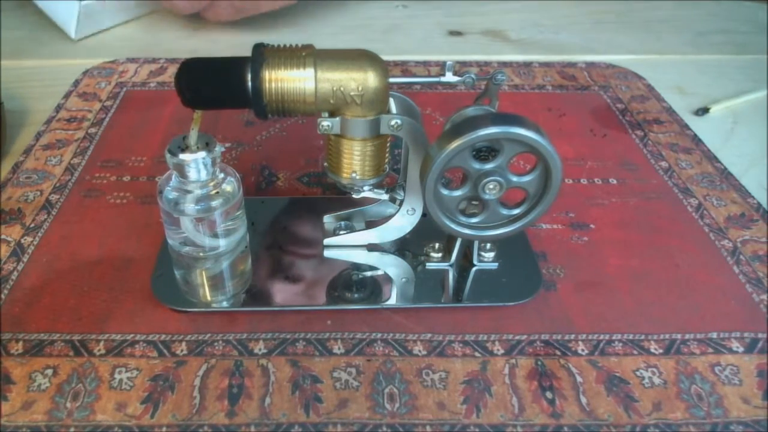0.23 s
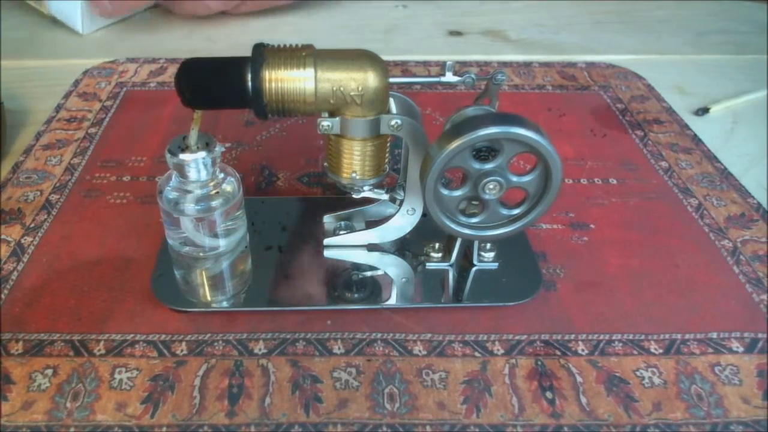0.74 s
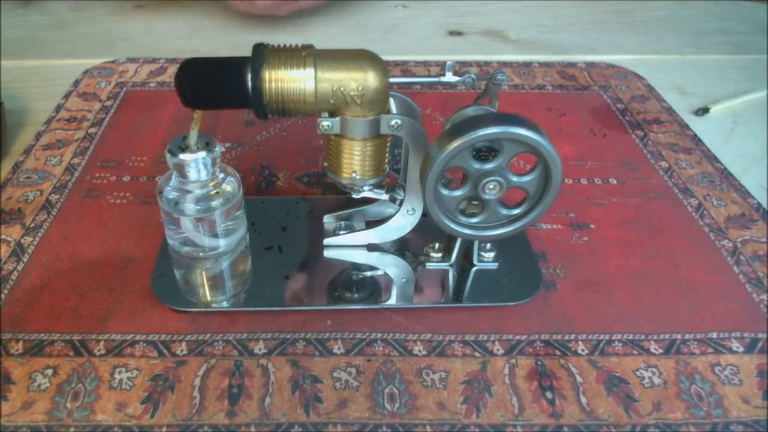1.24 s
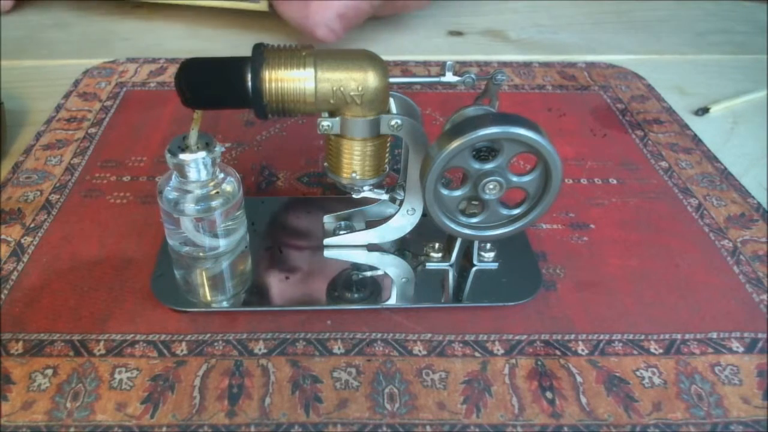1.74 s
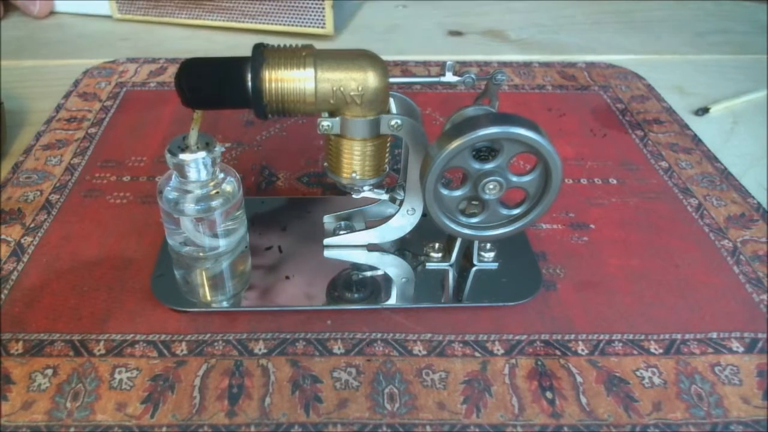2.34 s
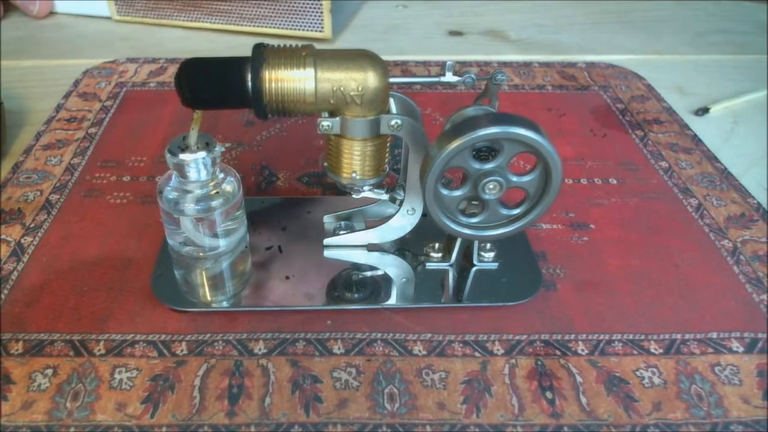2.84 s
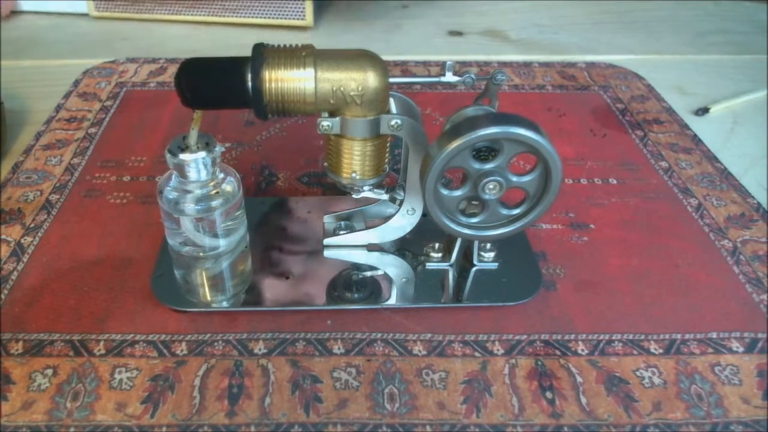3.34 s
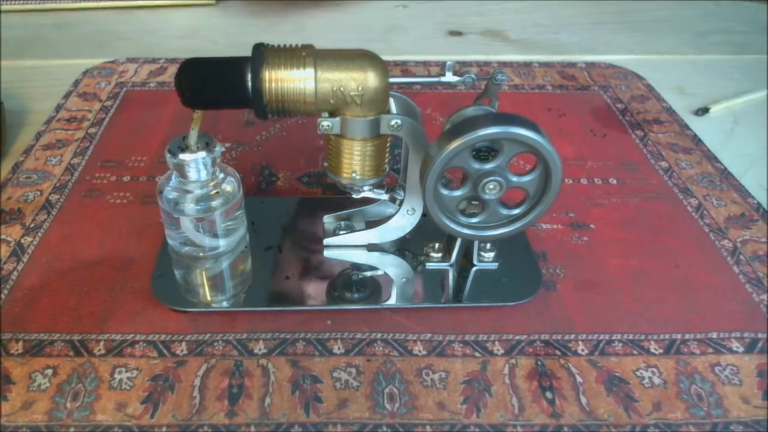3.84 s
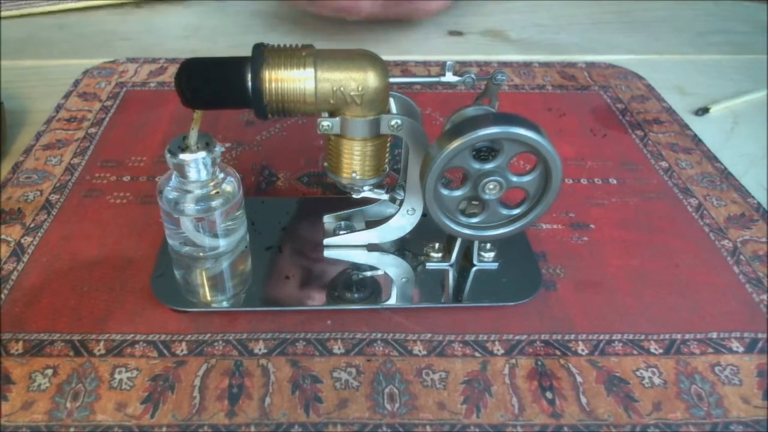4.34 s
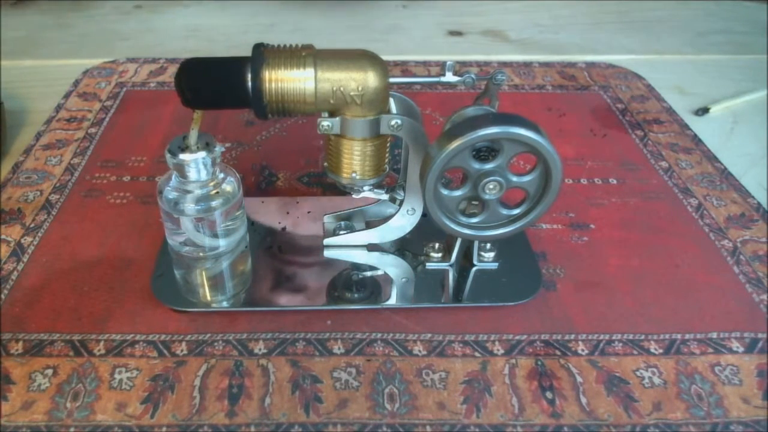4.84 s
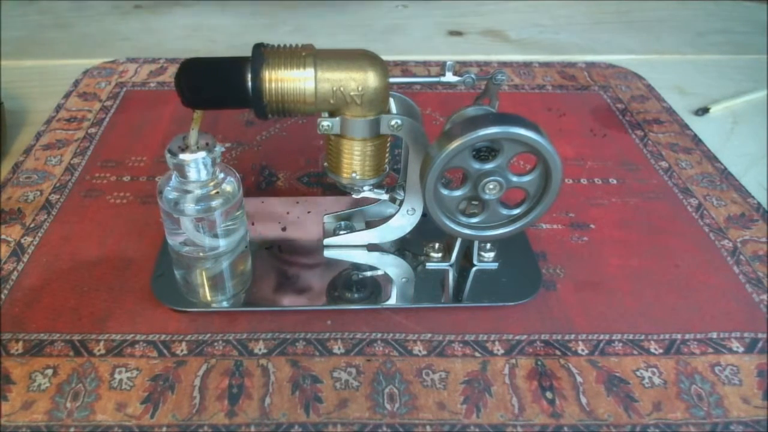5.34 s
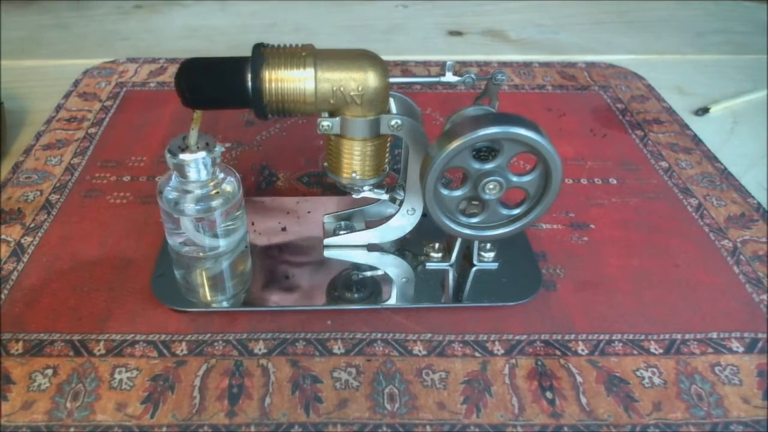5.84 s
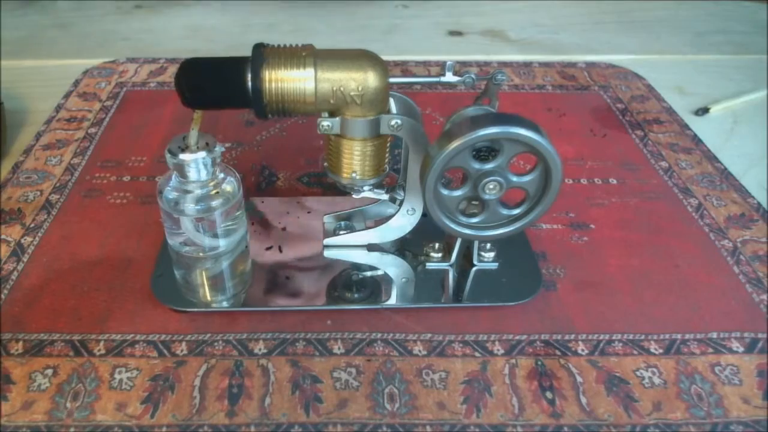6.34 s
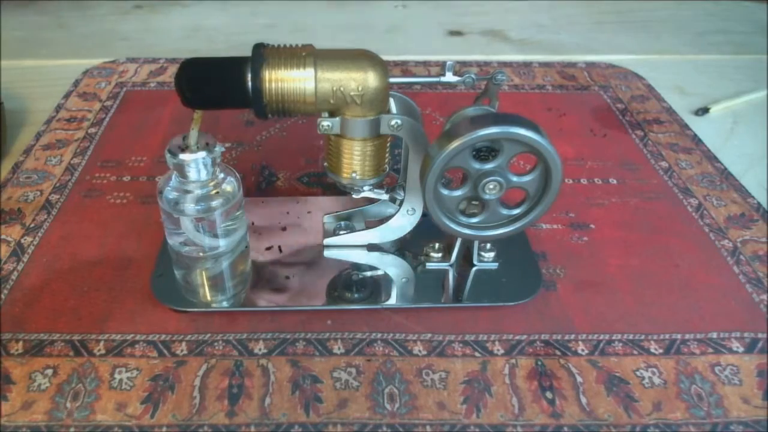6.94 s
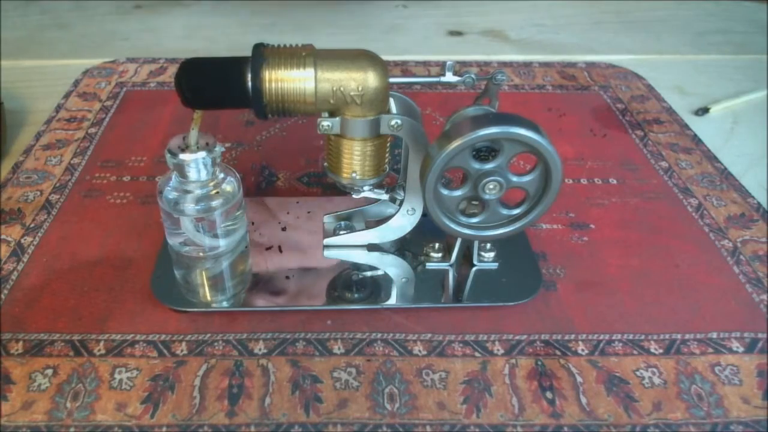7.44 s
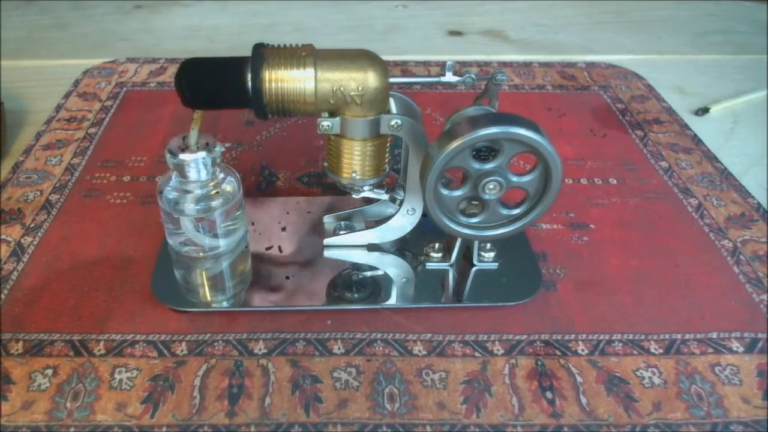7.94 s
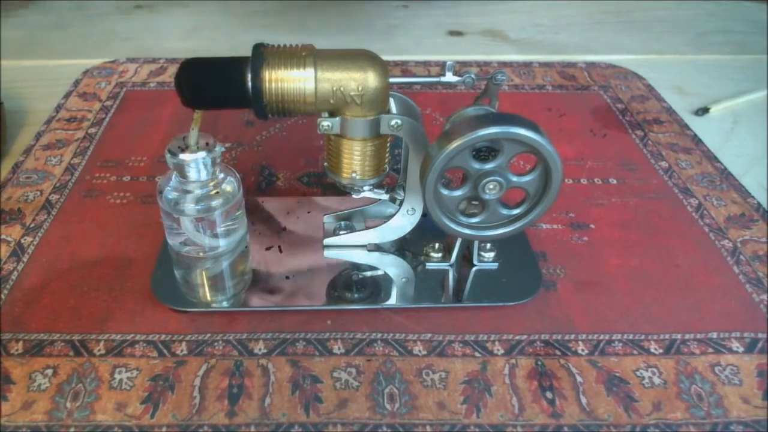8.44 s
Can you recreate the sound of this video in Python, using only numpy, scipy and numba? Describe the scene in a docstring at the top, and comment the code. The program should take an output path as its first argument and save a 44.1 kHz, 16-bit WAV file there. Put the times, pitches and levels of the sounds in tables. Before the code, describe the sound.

A small, quiet room with low rumble, faint steady hiss and hum; everything happens close to the microphone. From 0 s fingers rustle softly on a cardboard matchbox. Around 0.5-0.8 s the drawer eases out with a hollow, gritty scrape and dull thud. More rubbing and small knocks follow, and at 1.4-1.8 s it slides further open, ending in a firmer tap. From 2.1 to 3 s loose matchsticks tick and rub as one is picked out. At 3.4-3.6 s the box scrapes shut. Light finger rustles and taps continue to 4.7 s. Short raspy strikes with squeaky chatter and hollow box knocks come at about 5.1, 6.05, 7.16 and 7.8 s, with soft handling between the first few. The fifth, at 8.1 s, is the loudest and sharpest, bursting into crackling sparks, then a soft fluttering, fizzing hiss until the end.

```python
"""Fingers rustle on a cardboard matchbox, close by in a small room with a faint hum.
The drawer slides open with a gritty scrape, loose matches tick as one is picked out, and the box is pushed shut.
The match is struck five times: its head chatters over the dotted striking strip and rings the hollow box.
The last stroke lights it and it flares with a soft hiss.
Rubbing is made of tiny random slips, squeaks of swept tones, and knocks and sparks of short dying bursts."""
import sys
import numpy as np
from scipy import signal
from scipy.fft import rfft, irfft
from scipy.io import wavfile
from numba import njit

SR = 44100
rng = np.random.default_rng(int(sys.argv[2]) if len(sys.argv) > 2 else 0)


def to_wav(s):
    """Save 16-bit WAV."""
    ch = np.atleast_2d(s).T  # columns
    pcm = np.round(np.clip(ch, -1, 1) * 32767)  # PCM
    wavfile.write(sys.argv[1], SR, pcm.astype(np.int16))


N = 383669
T = np.arange(N) / SR  # time of every sample, s
TOP_HZ = 15850  # upper limit of the treble


def undb(db):
    """Turn decibels into a gain."""
    return 10 ** (np.asarray(db) / 20)


def unit(x):
    """Scale a sound to an average (rms) level of 1."""
    return x / np.sqrt(np.mean(x ** 2))


def add(out, sound, s, peak_db):
    """Mix a short sound in at time s, with its peak at peak_db."""
    part = out[int(s * SR):][:len(sound)]
    part += undb(peak_db) * sound[:len(part)] / np.abs(sound).max()


def band(x, lo_hz, hi_hz, order=4):
    """Keep only the pitches between two limits."""
    limits = [lo_hz, min(hi_hz, SR / 2 - 1)]
    return signal.sosfilt(signal.butter(order, limits, "band", fs=SR, output="sos"), x)


def colour(x, points, size=8192):
    """Shape the spectrum through (pitch_hz, level_db) points, with a filter that never rings ahead of the sound."""
    hz, db = np.transpose(points)
    bin_hz = np.arange(size // 2 + 1) * SR / size
    log_gain = np.log(undb(np.interp(np.log(bin_hz + 1), np.log(hz), db)))
    # folding the cepstrum forward in time gives the minimum-phase filter
    cepstrum = irfft(log_gain)
    cepstrum[1:size // 2] *= 2
    cepstrum[size // 2 + 1:] = 0
    response = irfft(np.exp(rfft(cepstrum)))
    return signal.fftconvolve(x, response)[:len(x)]


def walk(rate):
    """Wander smoothly by chance, through this many new values per second, with a spread near 1."""
    values = rng.standard_normal(N // 20)
    return np.interp(T * rate, np.arange(len(values)), values)


def grains(per_s, spread_db):
    """Tiny slips at random moments; a wider spread makes a few much larger than the rest; rms 1."""
    size = undb(spread_db * np.minimum(rng.exponential(size=N), 4))
    sign = rng.choice([-1, 1], N)
    happens = rng.random(N) < per_s / SR
    return unit(sign * size * happens)


@njit
def resonate(x, hz, width_hz):
    """Ring at a pitch that may move, using a state-variable band-pass filter."""
    y, b, low = np.empty(len(x)), 0., 0.
    for i in range(len(x)):
        g, k = np.tan(np.pi * hz[i] / SR), width_hz / hz[i]
        v = (b + g * (x[i] - low)) / (1 + g * (g + k))
        b, low, y[i] = 2 * v - b, low + 2 * g * v, k * v
    return y


def press(start, length, attack_s, release_s):
    """Pressure of one contact: it builds, holds and dies away."""
    build = np.clip((T - start) / attack_s, 0, 1)
    return build * np.exp(-np.clip((T - start - length) / release_s, 0, 20))


def touches(rows, attack_s, release_s):
    """Body and treble gains of separate touches, whose powers add."""
    power = np.zeros((2, N))
    for start, length, body_db, treble_db in rows:
        power += np.outer(undb([body_db, treble_db]), press(start, length, attack_s, release_s)) ** 2
    return np.sqrt(power)


def travel(curve, edge_s=.006):
    """Body and treble gains along one continuous movement, silent outside it."""
    s, body_db, treble_db = np.transpose(curve)
    gate = np.clip(np.minimum(T - s[0], s[-1] - T) / edge_s + .5, 0, 1)
    return gate * undb([np.interp(T, s, body_db), np.interp(T, s, treble_db)])


def friction(gains, points, slips, trim_db, split_hz=2400):
    """A stream of slips, coloured; its body and its treble swell separately."""
    sound = colour(slips, points)
    body = unit(band(sound, 84, split_hz))
    treble = unit(band(sound, split_hz, TOP_HZ))
    return (gains[0] * body + gains[1] * treble) * undb(trim_db)


def bursts(rows, points, size=4096):
    """Sudden, quickly dying bursts of coloured noise from rows (time_s, peak_db, decay_s)."""
    out = np.zeros(N)
    for (s, db, decay), noise in zip(rows, rng.standard_normal((len(rows), size))):
        dying = noise * np.exp(-T[:size] / decay)
        add(out, colour(dying, points), s, db)
    return out


# balance of the quiet room's air noise: pitch_hz, level_db (only the shape counts)
AIR_SHAPE = [(10, 32.5), (25, 24.5), (38, 10.5), (60, 14), (85, 4), (160, 1.5), (270, 1), (450, -1),
             (900, -6), (1400, -11), (2300, -17.5), (4000, -18), (9000, -18), (16000, -19)]
# the quiet room's hum: pitch_hz, level_db (average)
HUM_TONES = [(49.5, -60), (257, -75), (350, -82)]


def background(air_db=-51):
    """Low rumble and an even hiss from steady noise, and a hum of sine tones wavering in level and phase."""
    out = unit(colour(rng.standard_normal(N), AIR_SHAPE)) * undb(air_db)
    for hz, db in HUM_TONES:
        level = np.sqrt(2) * undb(db + 1.9 * walk(6))
        out += level * np.sin(2 * np.pi * hz * T + 0.49 * walk(4.5))
    return out


# single wall echoes, before dulling: delay_s, level_db
WALL_ECHOES = [(.029, -20), (.064, -27.5)]
# the room's diffuse ring: lower_edge_hz, upper_edge_hz, time to fall by 60 dB in s, level_db (before band-limiting)
ROOM_RING = [(101.2, 570, 0.2, -11), (690, 1300, 0.35, -14), (1355, 3600, 0.37, -11.5),
             (2400, 14000, 0.36, -13.5)]


def room(x, build_s=0.016, wall_top_hz=3000, size=22050):
    """Dull echoes come back from the walls while diffuse reflections build up and die quickly."""
    t, response = T[:size], np.zeros(size)
    for delay, db in WALL_ECHOES:
        response[int(delay * SR)] += undb(db)
    response = band(response, 100, wall_top_hz, order=1)
    for lo_hz, hi_hz, t60, db in ROOM_RING:
        build = 1 - np.exp(-(t / build_s) ** 2)
        decay = build * np.exp(-np.log(1000) * t / t60)
        diffuse = rng.standard_normal(size) * decay / np.linalg.norm(decay)
        response += undb(db) * band(diffuse, lo_hz, hi_hz)
    return signal.fftconvolve(x, response)[:N]


# fingers rub and shift on the box: start_s, length_s, body_db, treble_db (before the trim)
FINGER_RUBS = [(.035, 0.066, -55, -74), (.1, 0.11, -62.5, -75), (.365, 0.053, -67, -64),
               (.95, 0.26, -62.5, -71), (1.115, .04, -51, -63.5), (1.245, 0.032, -47, -58.5),
               (1.755, 0.047, -53, -63), (3.692, 0.035, -53.5, -71), (3.875, 0.034, -57.5, -73),
               (3.96, 0.097, -65, -82), (4.085, 0.042, -52.5, -63.5), (4.125, 0.049, -58, -70),
               (4.24, 0.033, -51, -64), (4.29, 0.046, -50, -61.5), (4.46, 0.027, -52, -66.5),
               (4.545, 0.018, -58, -84), (4.62, 0.071, -64, -67), (4.69, 0.026, -54, -60),
               (5.38, 0.062, -62.5, -76), (5.88, 0.13, -62.5, -80), (5.995, 0.03, -48.5, -62),
               (6.175, 0.13, -56, -65), (6.238, 0.029, -54, -58), (6.36, 0.033, -61, -62.5),
               (6.6, 0.024, -61.5, -62.5)]
# the box is held and turned, rustling faintly: start_s, length_s, body_db, treble_db (before the trim)
BOX_HOLDS = [(0, 1.76, -64.5, -79.5), (1.8, 0.13, -72, -78), (3.62, 1.147, -69, -77),
             (5.82, 0.81, -71.5, -81)]
# tone of skin on cardboard: pitch_hz, level_db (only the shape counts)
FINGER_COLOUR = [(120, -30), (200, -14), (248, -1.5), (314, -15.5), (494, -6), (671, 0.5), (864, 2),
                 (1020, 0.5), (1780, -2.5), (2750, -20.5), (3010, -15), (3470, -21), (4310, -14.5),
                 (9550, -23), (15000, -47)]


def fingers(attack_s=0.018, release_s=.014):
    """Skin rustles coarsely over the cardboard, in slips of unsteady strength."""
    rustle = grains(per_s=2500, spread_db=1.5) * undb(2.6 * walk(120))
    return friction(touches(FINGER_RUBS + BOX_HOLDS, attack_s, release_s), FINGER_COLOUR, rustle, trim_db=-1.5)


# dull low thuds as the drawer hits its stop, the box is knocked and the match lights: time_s, peak_db, decay_s
DULL_THUDS = [(.702, -42.5, 0.017), (1.770, -37.5, .004), (1.793, -40.5, 0.0054), (2.434, -43, 0.0047),
              (3.552, -44, 0.023), (3.708, -44, 0.012), (4.702, -59, .006), (6.364, -40, 0.0092),
              (7.803, -39, 0.0071), (8.102, -27, 0.013)]
# tone of the thuds: pitch_hz, level_db (only the shape counts)
THUD_COLOUR = [(40, -24), (110, -1.5), (190, -8), (340, -4.5), (500, 1.5), (900, -15.5), (2000, -39.5)]


def thuds():
    """Dull low thuds of drawer, box and lighting match: low noise that starts at once and dies away."""
    return bursts(DULL_THUDS, THUD_COLOUR)


# the drawer's travels: time_s, hollow body_db, gritty treble_db (before the trim)
EASE_OUT = [(0.5, -65, -69), (0.538, -60, -69), (0.576, -49, -58), (0.608, -48.5, -60.5), (0.72, -46, -52),
            (0.77, -52, -64), (0.83, -66, -75)]
PUSH_OPEN = [(1.36, -58, -73), (1.428, -55, -62.5), (1.454, -60, -71), (1.462, -47.5, -69),
             (1.51, -44, -57.5), (1.542, -48.5, -67), (1.686, -42.5, -62), (1.694, -48.5, -58),
             (1.76, -48.5, -63.5)]
PUSH_SHUT = [(3.35, -68, -78), (3.378, -49.5, -60), (3.418, -42, -54), (3.544, -45, -56.5),
             (3.614, -62.5, -74), (3.622, -58, -79), (3.66, -67, -70)]
# tone of each travel, in the same order: pitch_hz, level_db (only the shape counts)
EASE_COLOUR = [(120, -44), (200, -18), (326, -7), (521, -8), (683, -1), (789, -5.5), (929, 6), (1020, -8),
               (1220, -2.5), (1850, -8), (2750, -27.5), (3230, -23), (6080, -22), (9380, -31), (15000, -42)]
OPENING_COLOUR = [(120, -64), (200, -37), (332, -14.5), (405, -24), (696, -8.5), (748, -11), (912, -2),
                  (998, -22), (1170, -5), (2900, -30.5), (4240, -24.5), (4890, -27), (7690, -27),
                  (9380, -35.5), (15000, -40)]
SHUTTING_COLOUR = [(120, -60), (200, -38), (287, -11), (344, -21), (591, -15.5), (849, -5), (1020, -8),
                   (1310, -2.5), (1570, -13), (1880, -5.5), (2290, -18), (2700, -18), (3060, -24),
                   (7420, -22.5), (15000, -38)]
# air resonance between drawer and sleeve as the drawer travels: time_s, pitch_hz
CAVITY_PITCH = [(.55, 1180), (.69, 1020), (.75, 1310), (1.45, 990), (1.53, 910), (1.67, 1040), (1.75, 1250),
                (3.37, 1430), (3.43, 1370), (3.5, 1090), (3.56, 890)]


def drawer(cavity_width_hz=230.0, cavity_db=2):
    """The drawer slides in its sleeve in tiny slips and rings the air inside, at a pitch that moves."""
    slide = grains(per_s=3000, spread_db=1.0) * undb(1.16 * walk(100))
    cavity_hz = np.interp(T, *np.transpose(CAVITY_PITCH))
    slide = slide + undb(cavity_db) * resonate(slide, cavity_hz, float(cavity_width_hz))
    eased = friction(travel(EASE_OUT), EASE_COLOUR, slide, trim_db=-0.65)
    opened = friction(travel(PUSH_OPEN), OPENING_COLOUR, slide, trim_db=-0.3)
    shut = friction(travel(PUSH_SHUT), SHUTTING_COLOUR, slide, trim_db=-0.7)
    return eased + opened + shut


# bending modes of loose matchsticks: pitch_hz
STICK_PITCHES = [1420, 1860, 2250, 3250, 3740, 4530, 5400, 6500]


def sticks(per_s=65.0, width_hz=380.0):
    """Loose matches clatter against each other, each contact with its own brief woody ring; rms 1."""
    out = np.zeros(N)
    for hz in STICK_PITCHES:
        out += resonate(grains(per_s, spread_db=1.5), np.full(N, float(hz)), float(width_hz))
    return unit(out)


# a fingertip stirs the loose matches: start_s, length_s, body_db, treble_db (before the trim)
MATCH_STIRS = [(2.102, 0.018, -59, -69), (2.15, 0.02, -48.5, -50.5), (2.18, 0.8, -61, -68.5),
               (2.252, 0.012, -62, -58), (2.315, .1, -66, -57), (2.355, 0.034, -52.5, -59),
               (2.405, 0.038, -54, -56), (2.598, 0.049, -57.5, -57), (2.66, .015, -55, -58),
               (2.732, 0.015, -56, -52.5), (2.768, 0.054, -55, -55), (2.83, 0.097, -56, -65),
               (3.1, 0.14, -72, -73.5)]
# tone of the stirred matches: pitch_hz, level_db (only the shape counts)
STIR_COLOUR = [(120, -47), (200, -18), (219, -1), (397, -15), (435, -1.5), (636, -1), (912, 5.5),
               (1020, -1.5), (1220, 1.5), (1880, -15), (2090, -14.5), (3600, -24.5), (4810, -19.5),
               (9900, -32), (15000, -43)]


def rummage(sticks_db=-2, attack_s=0.0073, release_s=0.011):
    """Loose matches rub and tick against each other as one is picked out."""
    rub = grains(per_s=2200, spread_db=0.0) * undb(3.1 * walk(120))
    rattle = rub + undb(sticks_db) * sticks()
    return friction(touches(MATCH_STIRS, attack_s, release_s), STIR_COLOUR, rattle, trim_db=-0.5)


# resonances of the hollow box: pitch_hz, width_hz, level_db
BOX_MODES = [(423, 570, -18), (660, 108, -6), (922, 50, 5), (1175, 110, -1), (1472, 135, -3),
             (1758, 150, -4), (2064, 150, -18.5)]


def box(push):
    """The cardboard box rings with its modes, every second one turned upside down."""
    out = np.zeros(len(push))
    for k, (hz, width, db) in enumerate(BOX_MODES):
        b, a = signal.iirpeak(hz, hz / width, SR)
        # the tiny offset keeps the filter from slowing down in silence
        out += (-1) ** k * undb(db) * signal.lfilter(b, a, push + 1e-18)
    return out


# wood and match head catching on the box: time_s, knock_peak_db, snap_peak_db
BOX_CATCHES = [(.017, -37, -64), (.839, -45, -49.5), (1.132, -43, -56), (1.279, -33, -57),
               (1.465, -35.5, -60), (1.7712, -26.5, -61), (1.793, -30, -62), (2.151, -35, -31),
               (2.257, -51, -41.5), (2.544, -50, -52), (2.640, -50, -40.5), (2.666, -36.5, -45),
               (2.718, -40, -40), (2.744, -54, -45), (2.818, -49, -43), (2.855, -39, -46),
               (2.972, -46, -48), (3.378, -37, -54), (3.936, -49, -47), (4.625, -46, -57),
               (4.669, -43, -40.5), (4.703, -45, -50), (5.161, -35, -40), (5.227, -41, -38.5),
               (5.999, -32, -39.5), (6.0592, -24, -28), (6.0665, -20, -28), (6.365, -32, -41.5),
               (7.1577, -24, -30), (7.175, -38, -41), (7.1838, -30, -34), (7.803, -28, -42.5),
               (7.826, -30, -37.5), (8.0967, -14.5, -39), (8.1030, -32, -19.5), (8.1118, -20, -19),
               (8.1140, -20, -20), (8.128, -33, -31), (8.198, -32, -33.5), (8.426, -42.5, -64)]
# tone of grit breaking, here and in the scrapes: pitch_hz, level_db (only the shape counts)
GRIT_COLOUR = [(200, -22.5), (1500, -9.5), (2150, 0), (2700, -8.5), (3300, -4), (4700, -1), (5600, -6),
               (7400, -7), (9000, -16), (11300, -13.5), (12800, -21), (16000, -14)]


def catches(snap_s=.0017, size=2048):
    """A catch throws off a brief crackle of grit and knocks the box."""
    out = bursts([(s, snap_db, snap_s) for s, _, snap_db in BOX_CATCHES], GRIT_COLOUR)
    knock = box(signal.unit_impulse(size))
    for s, knock_db, _ in BOX_CATCHES:
        add(out, knock, s, knock_db)
    return out


# bursts of regular chatter as wood or cardboard sticks and slips: middle_s, length_s, pitch_hz (average), level_db
CHATTER_BURSTS = [(1.506, .012, 923, -41), (1.681, 0.019, 1017, -40.5), (2.478, .018, 936, -52),
                  (2.548, .013, 924, -51), (2.864, .014, 934, -47), (2.928, .022, 912, -47.5),
                  (4.113, .024, 707, -53), (5.149, .006, 1770, -37), (5.1751, 0.018, 937, -20.5),
                  (6.0581, .024, 1145, -22.5), (6.068, .013, 950, -39), (7.159, .007, 936, -27),
                  (7.166, .0115, 1175, -27), (7.176, .01, 1016, -25), (7.191, .017, 1124, -36),
                  (7.812, .016, 670, -39.5), (7.82, .01, 950, -35), (8.1018, .0117, 1528, -13),
                  (8.1093, .0085, 1159, -14.5), (8.114, .0055, 975, -15.5)]


def chatter(jitter=0.033, rough_db=1.35, second_db=-24, sag=0.03):
    """Stick-slip repeats in short squeaky bursts that swell and fade while their rate sags by a small share."""
    out, speed, grip = np.zeros(N), 1 + jitter * walk(400), undb(rough_db * walk(500))
    for s, length, hz, db in CHATTER_BURSTS:
        on = np.abs(T - s) < length / 2
        progress = (T[on] - s) / length  # from -0.5 to 0.5
        swell = np.cos(np.pi * progress) ** 1.5
        phase = 2 * np.pi * np.cumsum(hz * (1 - sag * progress) * speed[on]) / SR
        tone = np.sin(phase) + undb(second_db) * np.sin(2 * phase)
        out[on] += np.sqrt(2) * undb(db) * swell * grip[on] * tone
    return out


# the match head dragged along the strip: start_s, time to full pressure in s,
# length_s (from start to release), box_db, grit_db
MATCH_STROKES = [(5.086, 0.043, 0.081, -49, -64), (5.14, .003, 0.016, -50, -59),
                 (5.157, 0.0022, 0.033, -34.5, -45.5), (6.047, .002, 0.032, -38, -46),
                 (7.1556, 0.0012, 0.044, -36, -46.5), (7.8, .001, 0.031, -40.5, -57.5),
                 (7.833, .002, 0.054, -53.5, -63), (8.0932, 0.0026, 0.015, -24, -36),
                 (8.11, .001, 0.016, -39, -39)]


def scrapes(release_s=0.005):
    """Each stroke crushes grit on the strip, which hisses and shakes the box."""
    slips = grains(per_s=6400, spread_db=1.0) * undb(3.8 * walk(350))
    push, grit = np.zeros(N), np.zeros(N)
    for start, rise, length, box_db, grit_db in MATCH_STROKES:
        contact = press(start, length, rise, release_s)
        push += contact * undb(box_db)
        grit += contact * undb(grit_db)
    ringing = box(slips * push) / np.std(box(slips))
    return ringing + grit * unit(colour(slips, GRIT_COLOUR))


# the head spitting sparks, at last bursting alight: time_s, peak_db, decay_s
SPARKS = [(6.0592, -32, 0.0025), (6.0665, -39, .002), (8.1033, -26, 0.0037), (8.1119, -16, .003)]
# tone of the sparks: pitch_hz, level_db (only the shape counts)
SPARK_COLOUR = [(1000, -21.5), (3000, -13), (4600, -3), (5700, -14), (7500, -5), (9200, -11.5), (10500, -1),
                (11600, 1), (12400, -10.5), (16000, -12.5)]
# the head burning off: time_s, flutter_db, hiss_db (before the trim)
BURN = [(8.115, -61, -50), (8.15, -49, -66), (8.2, -50, -59), (8.26, -58, -53), (8.34, -59.5, -60.5),
        (8.46, -55, -58), (8.55, -57.5, -57.5), (8.62, -61, -65), (8.72, -60, -60.5)]
# tone of the burning: pitch_hz, level_db (only the shape counts)
BURN_COLOUR = [(100, -1.5), (400, 1.5), (900, 5), (1500, -4), (2100, -15.5), (2900, -17), (3600, -6.5),
               (4500, -2.5), (5400, -8), (6400, -5.5), (8000, -18.5), (10300, -12.5), (13000, -19),
               (16000, -19)]


def flare():
    """The head spits sparks and lights; gas fizzes out of it while the new flame flutters."""
    fizz = grains(per_s=9400, spread_db=4.0) * undb(1.7 * walk(45))
    burning = friction(travel(BURN), BURN_COLOUR, fizz, trim_db=-2.5)
    return bursts(SPARKS, SPARK_COLOUR) + burning


def scene():
    """Box and match close by, with the room's reflections and its quiet background."""
    handling = fingers() + thuds() + drawer() + rummage()
    striking = catches() + chatter() + scrapes() + flare()
    near = handling + striking
    return (background() + room(near) + near)[None]


def record(dry):
    """A steep low-pass takes off the highest treble."""
    return signal.sosfilt(signal.ellip(10, .2, 70, TOP_HZ, fs=SR, output="sos"), dry)


dry = scene()
out = record(dry)
to_wav(out)
```